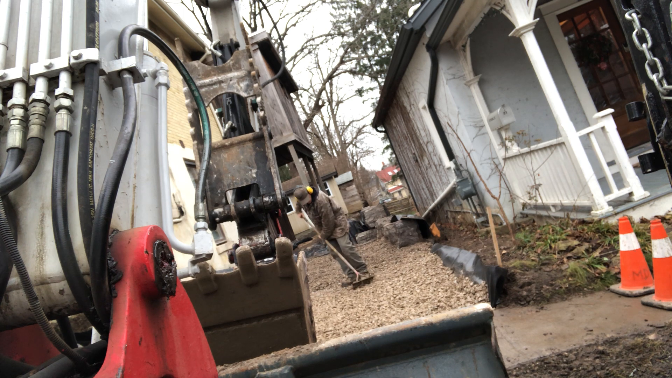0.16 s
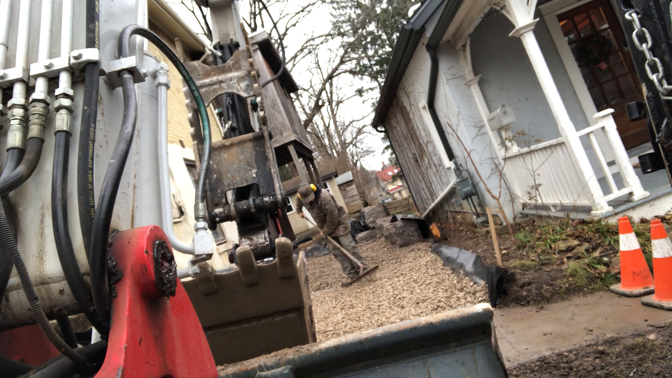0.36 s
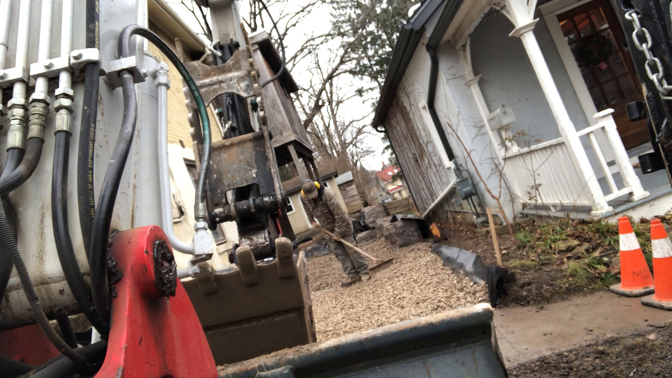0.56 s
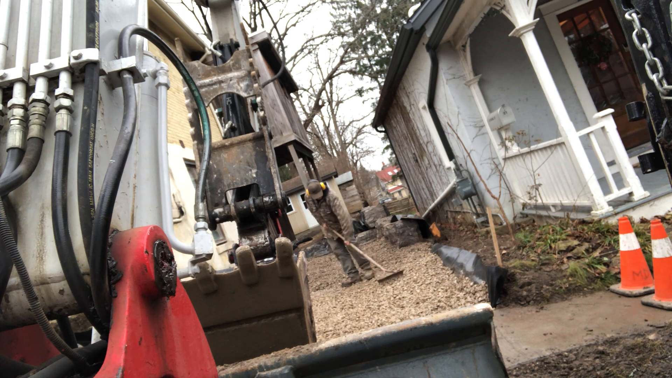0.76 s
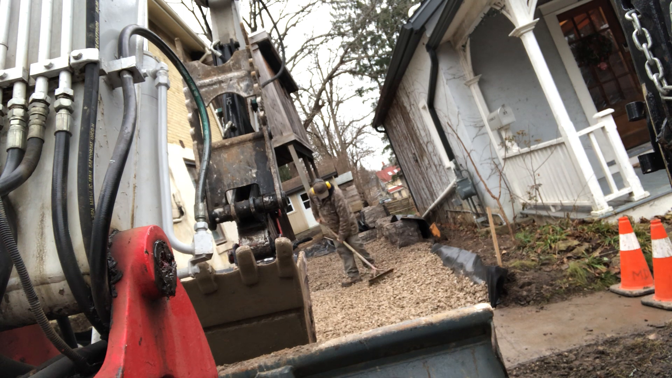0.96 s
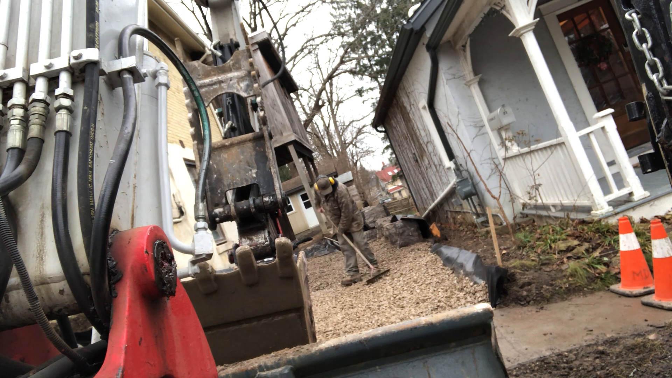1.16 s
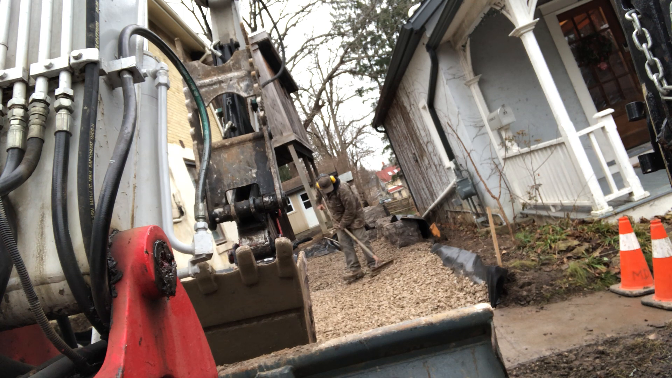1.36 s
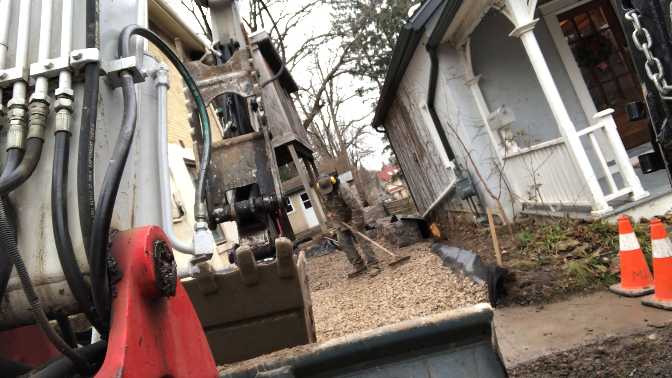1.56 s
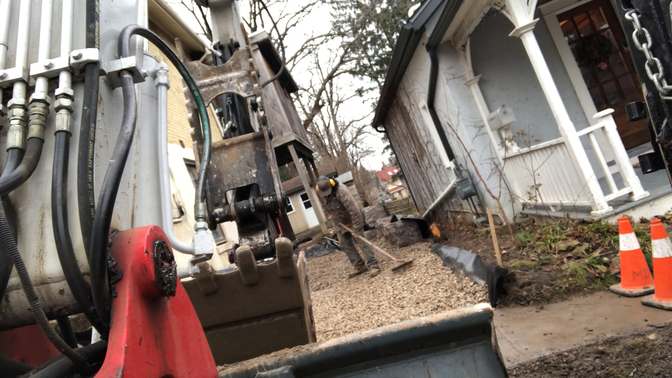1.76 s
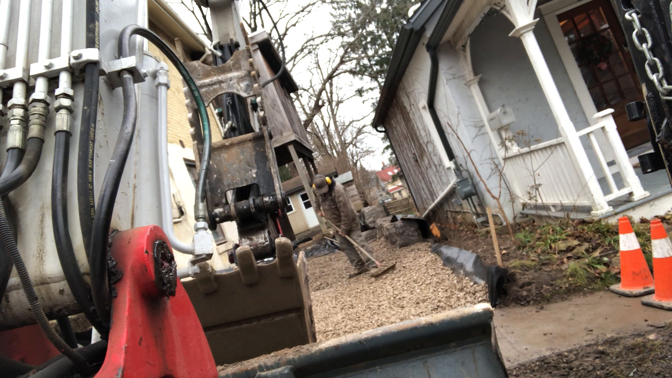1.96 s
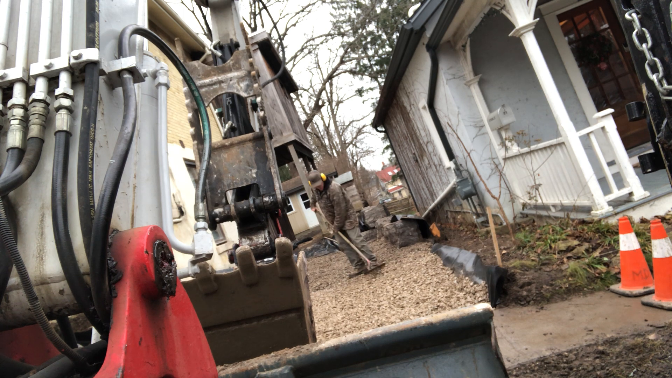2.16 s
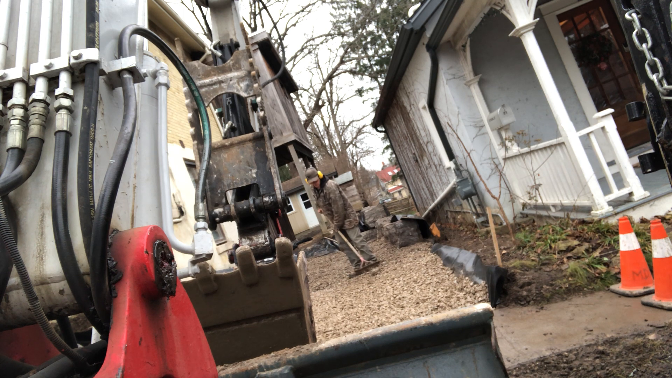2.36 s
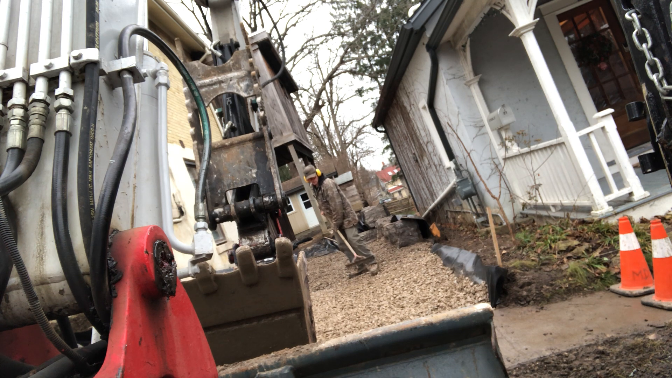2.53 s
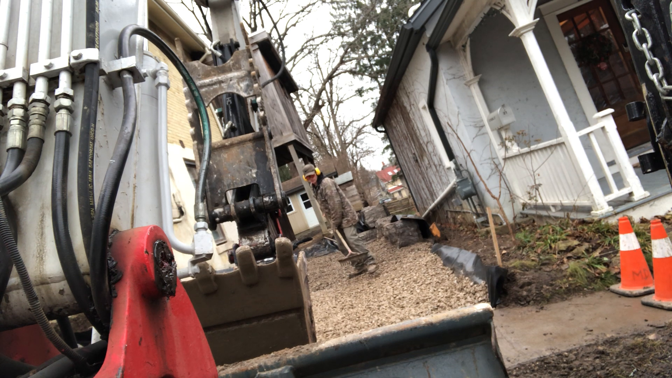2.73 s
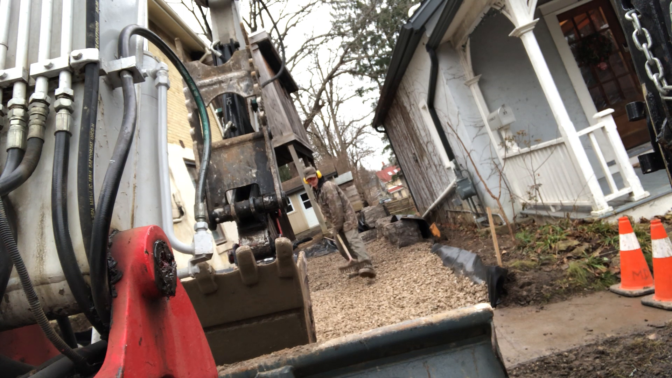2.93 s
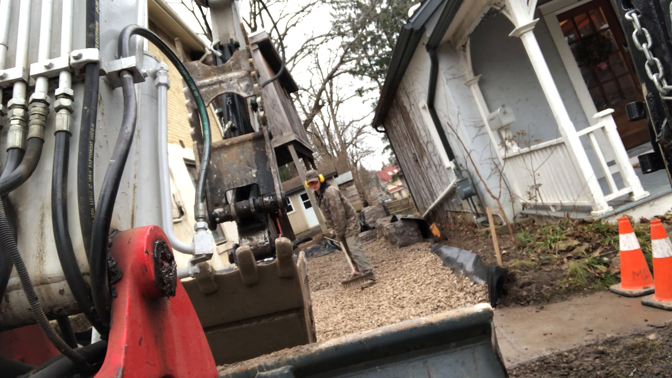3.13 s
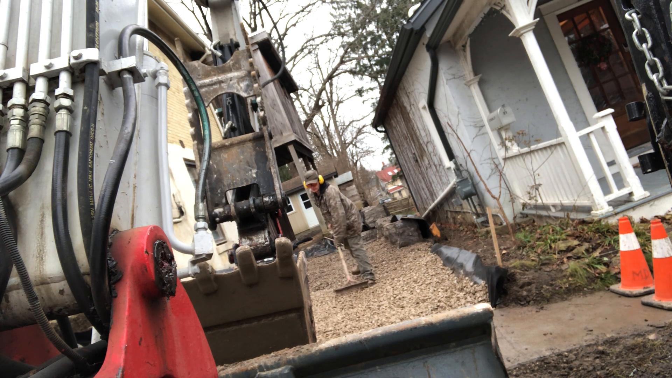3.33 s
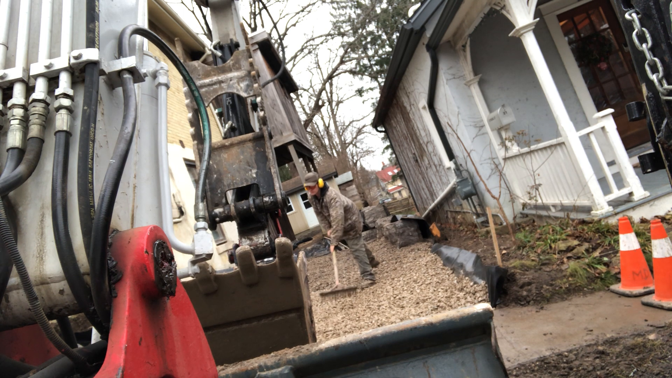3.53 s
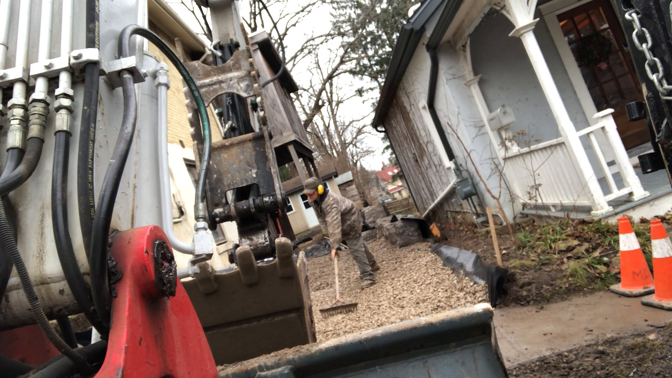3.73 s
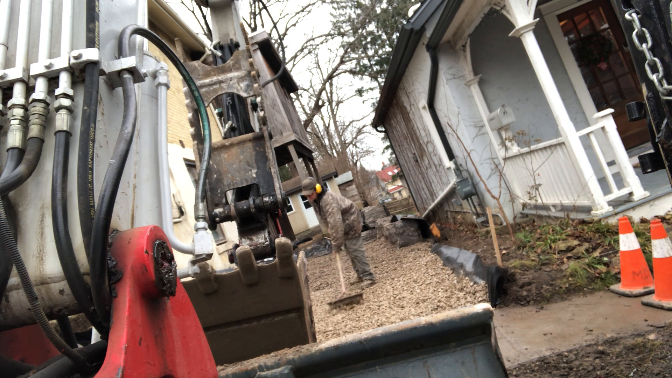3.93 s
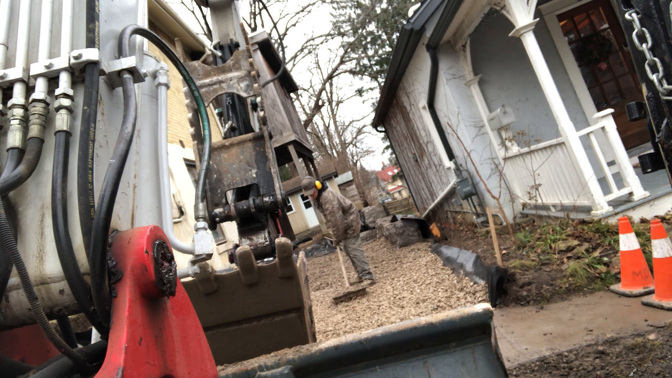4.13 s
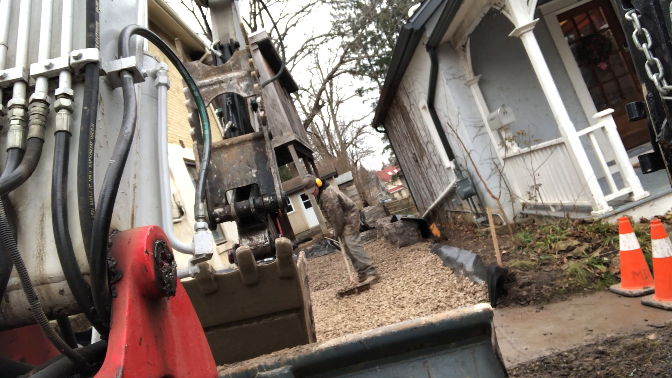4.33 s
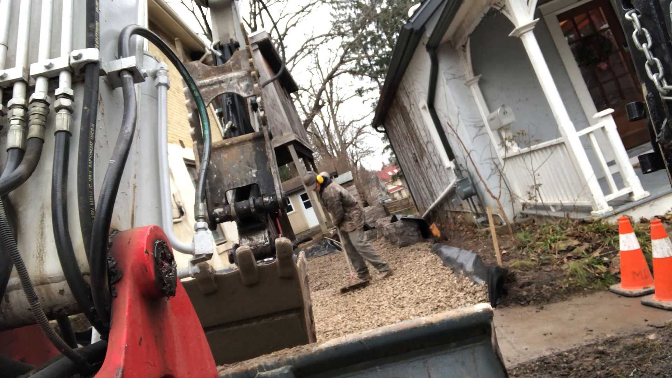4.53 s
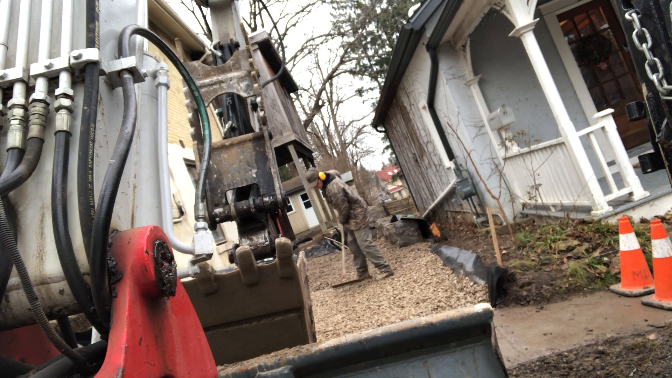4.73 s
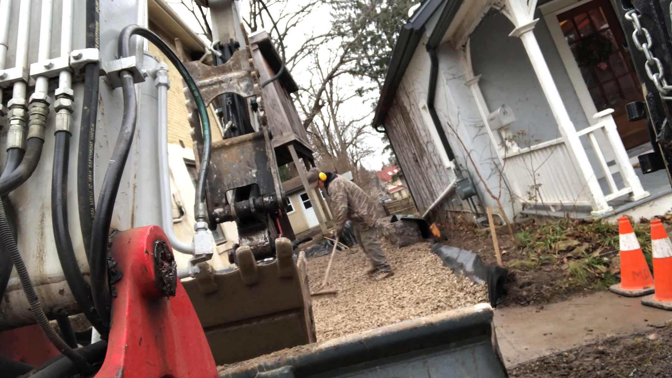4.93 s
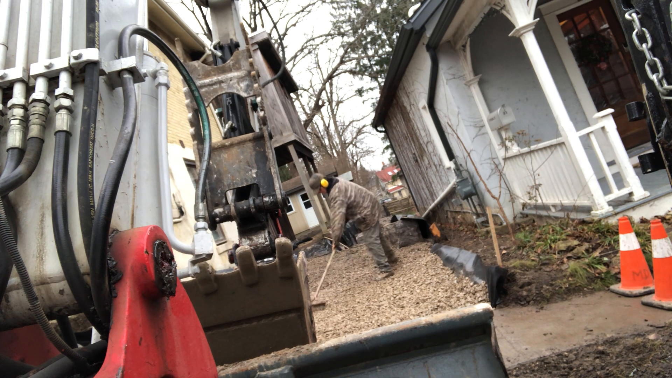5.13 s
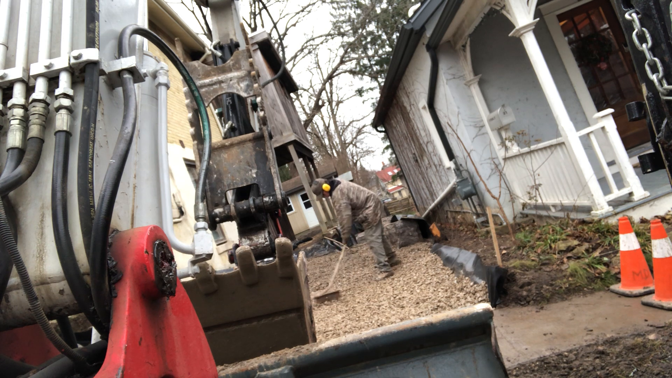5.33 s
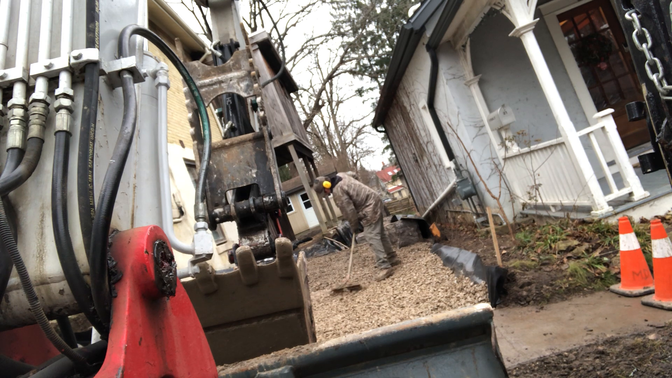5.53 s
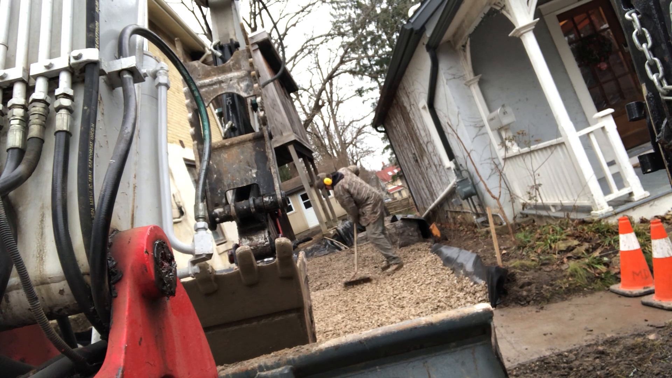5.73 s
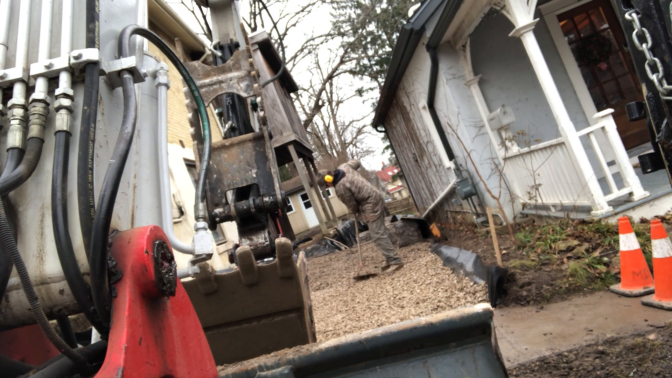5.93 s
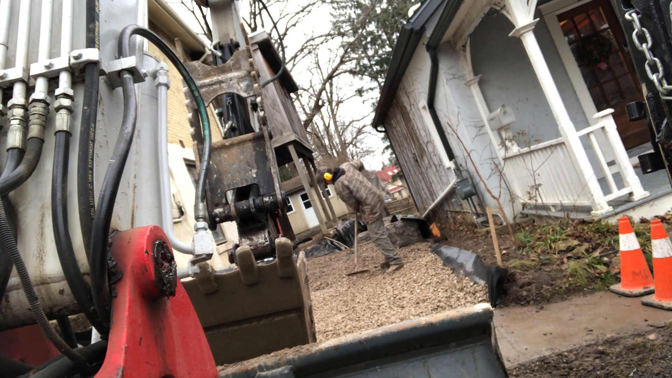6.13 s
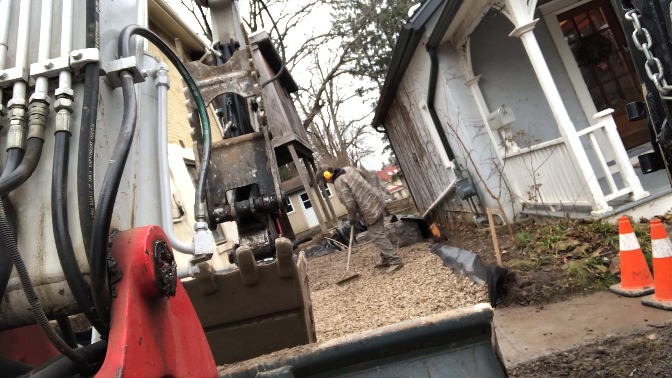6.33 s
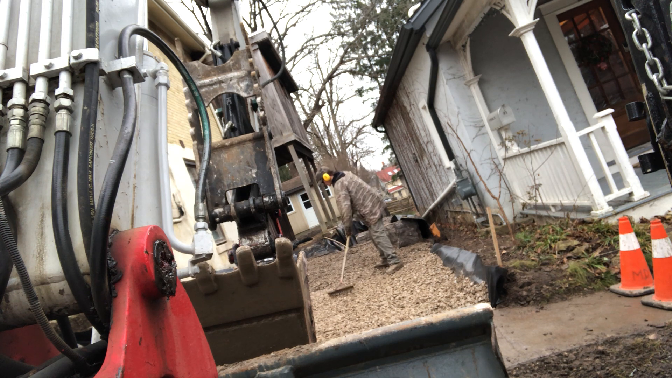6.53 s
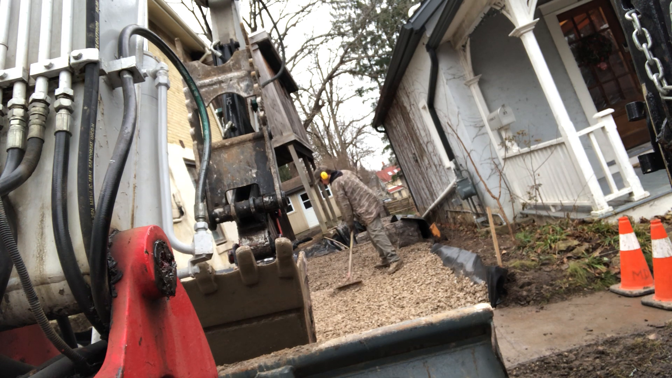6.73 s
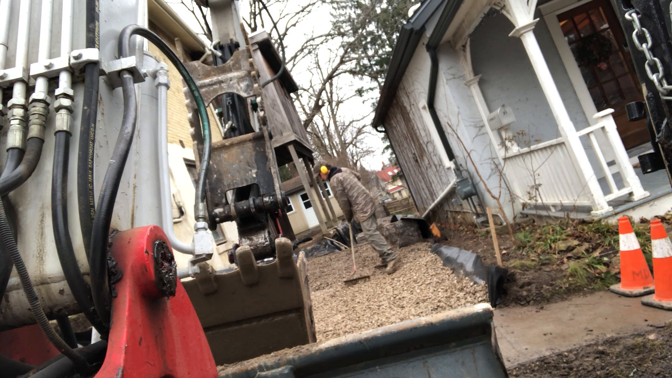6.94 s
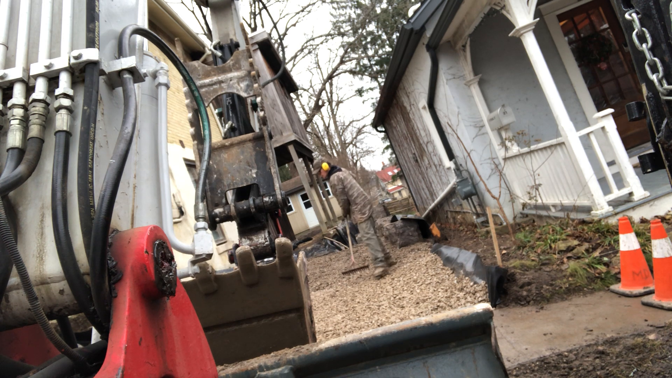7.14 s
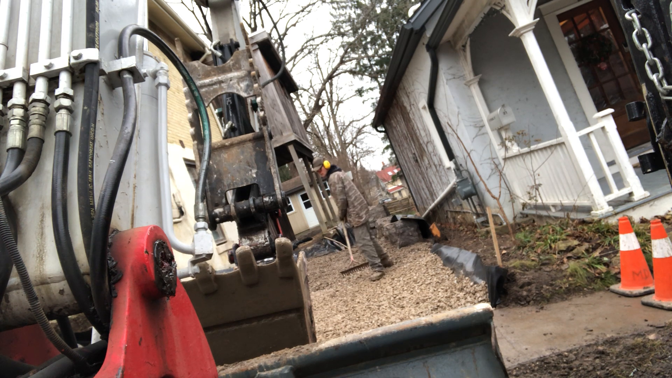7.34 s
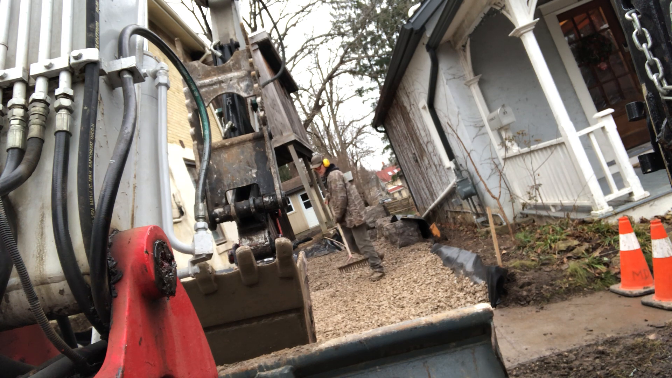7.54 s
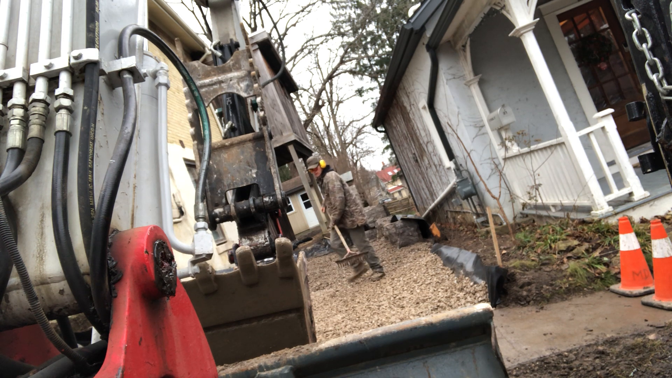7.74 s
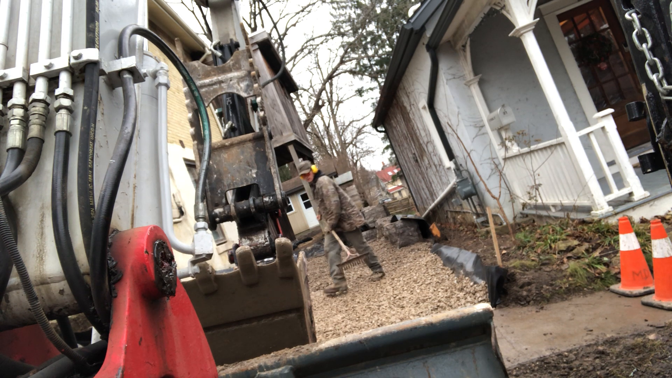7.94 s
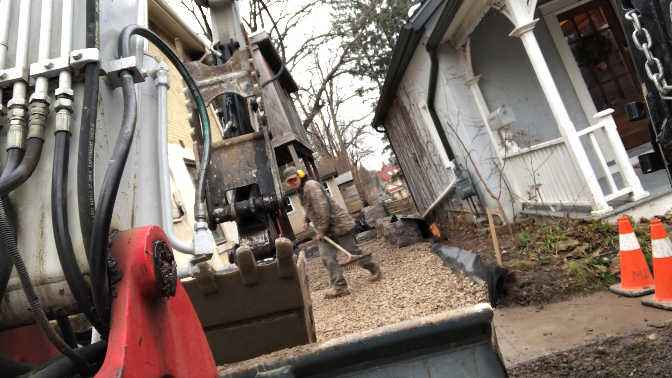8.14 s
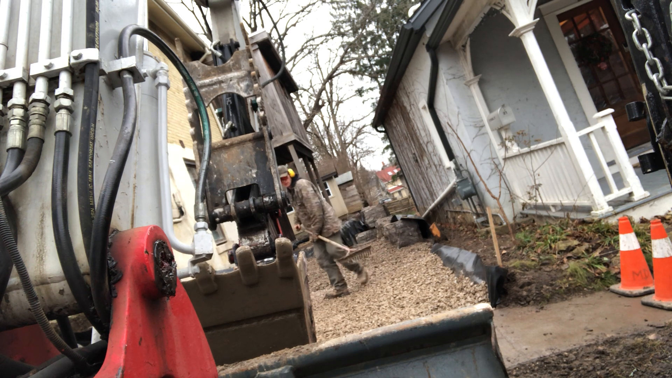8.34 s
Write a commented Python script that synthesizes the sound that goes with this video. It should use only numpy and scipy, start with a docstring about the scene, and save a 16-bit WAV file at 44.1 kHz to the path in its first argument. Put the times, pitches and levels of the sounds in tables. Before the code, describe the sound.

Bursts of gritty gravel raking with bright stony clacks and metallic tine ring, short pauses between, above soft distant rumble and hum.

```python
"""Broadband town rumble, fuzzy steady tones and the hum of far engines sound throughout, from the start.
A steel rake strokes loose gravel again and again: random stone collisions excite stone and steel modes,
hard single blows ring at one pitch, stones trickle on, and wall and parked machinery return echoes.
A thin tone passes at 1 s; a boot lands near 3 s, as filtered noise with a share of sine, and again at 8 s.
From 3.4 s a second hum, slightly lower, beats with the first."""
import sys
import numpy as np
from scipy import signal
from scipy.io import wavfile

SR = 44100
rng = np.random.default_rng(int(sys.argv[2]) if len(sys.argv) > 2 else 0)


def unload_audio(sound):
    """Save the sound as a 16-bit wav file, at the path given as the first command line argument."""
    columns = np.transpose(np.atleast_2d(sound))
    # keep every value between -1 and 1, then stretch to whole-number steps
    steps = np.round(np.clip(columns, -1, 1) * 32767)
    wavfile.write(sys.argv[1], SR, steps.astype(np.int16))


N = 369999


def gain_of(db):
    """Amplitude ratio: 20 dB is a factor of ten."""
    return 10 ** (np.asarray(db) / 20)


def evened(x):
    """Normalisation to unit rms."""
    return x / np.sqrt(np.mean(x ** 2) + 1e-20)


def read_spectrum(points, hz):
    """Linear interpolation of level on a logarithmic frequency axis."""
    f, level_db = np.transpose(points)
    return np.interp(np.log(hz + 1), np.log(f + 1), level_db)


def colour(x, points):
    """Minimum-phase filtering: the Hilbert transform of log gain gives the causal phase."""
    hz = abs(np.fft.fftfreq(8192, 1 / SR))
    log_gain = np.log(gain_of(np.maximum(read_spectrum(points, hz), -100)))
    phase = -signal.hilbert(log_gain).imag
    taps = np.fft.ifft(np.exp(log_gain + 1j * phase)).real[:4096]
    return signal.oaconvolve(x, taps)[:len(x)]


def mode(x, hz, width):
    """Single resonance: a two-pole peak of unit gain at its centre."""
    return signal.lfilter(*signal.iirpeak(hz, hz / width, SR), x)


def split(x, edges_hz):
    """Band-pass analysis: adjoining Butterworth bands from 30 Hz to 20 kHz."""
    edges_hz = [30, *edges_hz, 20000]
    bands = []
    for pair in zip(edges_hz, edges_hz[1:]):
        sos = signal.butter(4, pair, "band", fs=SR, output="sos")
        bands.append(signal.sosfilt(sos, x))
    return bands


def drift(hz):
    """Slow random modulation of unit rms: hz random values a second, joined by straight lines."""
    knots = rng.standard_normal(1000)
    return evened(np.interp(np.arange(N) / SR * hz, np.arange(1000), knots))


# Rumble spectrum: (frequency [Hz], relative spectral density [dB per Hz])
RUMBLE_SPECTRUM = [(15, -84), (25, -50), (43, -13.5), (60, -8.5), (110, -3.5), (190, -10), (270, -13),
                   (500, -15.5), (560, -22), (960, -24.5), (1300, -24), (2120, -29), (2250, -34),
                   (4000, -39), (7800, -45), (8300, -49), (16000, -51)]
RUMBLE_DB = -58.5


def rumble():
    """Coloured noise with slight amplitude modulation: the town rumble swells a little."""
    noise = colour(rng.standard_normal(N), RUMBLE_SPECTRUM)
    return gain_of(RUMBLE_DB + 0.49 * drift(hz=11.0)) * evened(noise)


# Fuzzy steady tones: (frequency [Hz], width of each of two resonances [Hz], rms level [dB])
FUZZY_TONES = [(124.9, 14.4, -65), (151, 13.8, -66.5), (235.4, 11.3, -71), (436.8, 31, -71.5),
               (1216, 14, -82), (1498, 26, -79.5), (1743, 25, -85), (2000, 1.27, -80.5), (2026, 34, -81)]


def fuzzy_tones():
    """Narrow-band noise: resonances in cascade leave tones of uneven amplitude, heard as a faint whine."""
    noise = rng.standard_normal(N)
    return sum(gain_of(db) * evened(mode(mode(noise, hz, width), hz, width)) for hz, width, db in FUZZY_TONES)


# Engine hum: (time [s], frequency [Hz], rms level of the first hum [dB])
ENGINE_HUM = [(0, 75.5, -72), (.35, 73.3, -69.5), (.96, 73, -59), (1.4, 73.7, -61), (2.1, 76.1, -56.5),
              (2.6, 76.1, -56.5), (2.75, 76.1, -63.5), (3.15, 75.8, -56), (3.6, 75.5, -63),
              (5.4, 75.8, -62), (8.39, 76.4, -65.5)]
SECOND_FROM_S, SECOND_RISE_S, SECOND_SHARE = 3.36, 0.29, 0.96  # share of the first hum's amplitude
BEAT_PER_S, FIRST_DIP_S = 0.79, 3.48


def engine_hums():
    """Beating: two sines a fraction of a hertz apart reinforce and cancel by turns."""
    t = np.arange(N) / SR
    s, hz, db = np.transpose(ENGINE_HUM)
    phase = 2 * np.pi * np.cumsum(np.interp(t, s, hz)) / SR
    second = SECOND_SHARE * np.clip((t - SECOND_FROM_S) / SECOND_RISE_S, 0, 1)
    lag = 2 * np.pi * BEAT_PER_S * (t - FIRST_DIP_S)
    pair = np.sin(phase) - second * np.sin(phase - lag)
    return np.sqrt(2) * gain_of(np.interp(t, s, db)) * pair  # sqrt(2): peak to rms


def knocks(crunch_db, most_per_s, thinning, spread_db, clump_db, sort_db, cycles, pitched):
    """Random point process: stone collisions, many under the rake, fewer as the gravel settles."""
    rate = most_per_s * gain_of(thinning * (crunch_db - crunch_db.max()))
    rate = np.clip(rate, 900, SR / 2)
    size = gain_of(spread_db * np.minimum(rng.exponential(1, N), 4) + clump_db * drift(hz=55))
    size = size / np.sqrt(np.mean(size ** 2))
    struck = rng.random(N) < rate / SR
    train = size * struck * np.sqrt(SR / rate) * gain_of(crunch_db)  # power independent of rate
    stone, t, out = rng.integers(0, 24, N), np.arange(1024) / SR, np.zeros(N)
    for k, hz in enumerate(np.linspace(1100, 15500, num=24)):
        rattle = rng.standard_normal(1024) * gain_of(-60 * t / 0.0063)
        # each size of stone has its pitch
        rattle += pitched * evened(mode(rattle, hz, hz / cycles)) * np.std(rattle)
        share = gain_of(sort_db * drift(hz=18))  # the tines meet now more, now fewer of this size
        out += signal.oaconvolve(train * share * (stone == k), rattle / np.linalg.norm(rattle))[:N]
    return out


# Stone spectrum: (frequency [Hz], relative spectral density [dB per Hz])
STONE_SPECTRUM = [(410, -42), (700, -5), (863, -11.5), (1420, -7.5), (1620, 2.5), (2700, -6.5),
                  (3600, -7.5), (4320, -0.5), (7290, -4.5), (8310, -9), (9860, -7), (15000, -19),
                  (16000, -25)]
# Modes of the steel rake head: (frequency [Hz], width [Hz], relative level [dB])
RAKE_MODES = [(1350, 45, -27), (1488, 160, 5.5), (2750, 325, 3.5), (3086, 260, 0), (4330, 60, -3.5),
              (5600, 160, -32), (6020, 230, -14.5), (7290, 153, -2)]


def gravel_and_rake(x, contacts, steel_db=-2):
    """Modal excitation: knocks sound as stone and drive each steel mode as far as contact allows."""
    steel = np.zeros(len(x))
    for (hz, width, db), contact in zip(RAKE_MODES, contacts):
        steel += gain_of(db) * mode(x * contact, hz, width)
    return colour(x, STONE_SPECTRUM) + gain_of(steel_db) * steel


TICKS_PER_S, TICK_DB, TICK_TOP_DB = 130, -6.5, -8.5  # relative levels; the last is for the top band


def ticks(level_db):
    """Sparse impulse noise: loose pebbles tick on their own, brightly and very unevenly, in and after strokes."""
    size = gain_of(1.7 * np.minimum(rng.exponential(1, N), 3))
    struck = size * (rng.random(N) < TICKS_PER_S / SR)
    envelope = signal.lfilter([1], [1, -np.exp(-1 / (.0015 * SR))], struck)  # 1.5 ms decay
    burst = envelope * rng.standard_normal(N)
    _, mid, top = split(colour(burst, STONE_SPECTRUM), [2450, 6500])
    return gain_of(TICK_DB + level_db) * evened(mid + gain_of(TICK_TOP_DB) * top)


def lay(tables, quiet_db):
    """Piecewise-linear envelopes over the whole length; the first is quiet between tables."""
    t, rows = np.arange(N) / SR, np.concatenate(tables)
    columns = [np.interp(t, rows[:, 0], column) for column in rows.T[1:]]
    inside = sum((t >= table[0][0]) & (t <= table[-1][0]) for table in tables) > 0
    return [np.where(inside, columns[0], quiet_db)] + columns[1:]


# One table a stroke or shuffle, before the mix gain:
# (time [s], crunch level [dB], ring of the rake above the crunch [dB])
RAKE_STROKES = [
    [(0.0, -46.5, 0.5), (0.03, -54, -9), (0.132, -49, -6), (0.372, -54, -7.5), (0.504, -63, -11),
     (0.596, -77, 1), (0.6, -70, -4)],
    [(0.843, -56.5, -6), (0.865, -49.5, 9), (0.883, -68, -5), (0.897, -50, 0), (1.005, -45, -1),
     (1.253, -53.5, 0), (1.337, -60, -2), (1.415, -63, -11), (1.55, -74, -11)],
    [(1.724, -64, -4), (1.733, -61.5, -1), (1.75, -79, 23)],
    [(1.757, -54.5, 1), (1.849, -56.5, 3.5), (1.905, -63, 2), (1.908, -52, 3)],
    [(1.917, -32, -7), (1.939, -52.5, 3), (1.965, -41, -5), (1.995, -51.5, 1), (2.049, -53, 3),
     (2.057, -39, -8), (2.069, -51.5, -3), (2.135, -56, 4.5), (2.4, -76, -9)],
    [(3.135, -58, -25), (3.141, -61, -12), (3.149, -61, 2), (3.179, -55.5, 0), (3.28, -76, 9)],
    [(3.788, -54, -3), (3.798, -49, 1.5), (3.822, -55.5, -1), (3.91, -47.5, -2.5), (4.336, -46, -6.5),
     (4.35, -44, -11), (4.44, -44.5, -1.5), (4.578, -47, -4.5), (4.69, -52, -13), (4.7, -50.5, -14),
     (5.042, -74, -14), (5.05, -77, 0)],
    [(5.203, -58.5, -9), (5.219, -52.5, -1), (5.255, -62, -1), (5.299, -47.5, -3), (5.577, -41.5, -5.5),
     (5.817, -49, -6.5), (6.049, -50, -11), (6.153, -57.5, -7), (6.243, -59, -18.5), (6.361, -68, -4),
     (6.379, -69, -17), (6.45, -75, 1)],
    [(6.64, -49, -5), (6.706, -57, 7.5), (6.712, -43, 3.5), (6.73, -54.5, 1), (6.786, -42.5, -2.5),
     (6.95, -52.5, 2), (6.978, -47, 0), (7.01, -55.5, 1), (7.178, -63, -9), (7.184, -71, 1), (7.52, -75, 3)],
    [(7.84, -81, 17), (8.064, -80, -6), (8.088, -70, -13), (8.11, -65.5, 6), (8.292, -79.5, 6),
     (8.3, -79, 10)],
]
# What each stroke stirs up at full crunch: (large stones above the crunch [dB], grit above it [dB])
STIRRED_BEDS = [(-4, -11), (0, -11), (10, -15.5), (1.5, -11), (1.5, -10.5), (-2.5, -14), (-2, -9), (-2, -8),
                (-1.5, -8.5), (4, -4.5)]
FULL_DB = -48  # crunch of a full stroke, before the mix gain
# as the crunch falls below that, large stones linger and grit thins (dB per dB)
LARGE_PER_DB, GRIT_PER_DB = -0.3151, .06
WANDER_DB, WANDER_HZ = 5, 7  # other tines catch from moment to moment, so each ring comes and goes
SETTLE_S = 0.13  # the bed falls silent this long after a stroke, unless the next begins
# Lowest ring favoured by the scraping head: (frequency [Hz], width [Hz], added level [dB])
SCRAPE_MODE = (1410, 200, 8)


def strokes():
    """Granular friction: dense collisions in four bands, from the ring of the rake to the finest grit."""
    next_starts = [table[0][0] for table in RAKE_STROKES[1:]] + [N / SR]
    tables = []
    for table, bed, next_start in zip(RAKE_STROKES, STIRRED_BEDS, next_starts):
        end = min(table[-1][0] + SETTLE_S, next_start)
        tables.append(np.array([(*row, *bed) for row in [*table, (end, -90, 0)]]))
    crunch_db, ring_db, large_db, grit_db = lay(tables, quiet_db=-120)
    force_db = np.maximum(crunch_db - FULL_DB, -30)
    large_db = large_db + LARGE_PER_DB * force_db
    grit_db = grit_db + GRIT_PER_DB * force_db

    hits = knocks(crunch_db, most_per_s=9000, thinning=.4, spread_db=2.0, clump_db=1.0,
                  sort_db=2.0, cycles=6.5, pitched=0.78)
    contact = np.clip((crunch_db + 64) / 12, 0, 1)  # the faint trickle comes after the rake has lifted
    contacts = [contact * gain_of(WANDER_DB * drift(WANDER_HZ)) for _ in RAKE_MODES]
    bands = split(gravel_and_rake(hits, contacts, steel_db=-5.0), [2050, 3700, 8200])
    scrape_hz, scrape_width, scrape_db = SCRAPE_MODE
    bands[0] = bands[0] + gain_of(scrape_db) * mode(bands[0], scrape_hz, scrape_width)

    level = np.sqrt(np.mean(gain_of(crunch_db) ** 2))
    band_dbs = (ring_db, large_db, 0, grit_db)
    crunch = level * sum(gain_of(db) * evened(band) for db, band in zip(band_dbs, bands))
    return crunch + ticks(FULL_DB + 0.91 * (crunch_db - FULL_DB))


def yard(x, t60, first_s):
    """Diffuse reflection: wall and machinery scatter echoes, changing as the rake moves about."""
    t, out = np.arange(6000) / SR, np.zeros(N)
    for k in range(3):
        signs = rng.choice([-1., 1.], 6000) * (rng.random(6000) < .1)
        taps = signs * gain_of(-60 * t / t60) * (t > first_s)
        # three echo patterns trade places at constant summed power
        share = np.sqrt(2 / 3) * np.cos(np.pi * (14 * np.arange(N) / SR + k / 3))
        out += signal.oaconvolve(x * share, taps / np.linalg.norm(taps))[:N]
    return out


# Single stones struck hard, before the mix gain: (time [s], peak level [dB], ring frequency [Hz],
# 1.05-3.7 kHz level above the middle band [dB], treble level above the middle band [dB])
HARD_BLOWS = [(0.1002, -46, 4260, -5, -4), (0.134, -30.5, 4330, -8, 3), (0.2083, -39, 2940, -5, -4),
              (0.3372, -37, 5330, 2, -9), (0.4746, -39, 5660, -1, 1), (0.846, -32.5, 3350, -11, -1),
              (0.8987, -27.5, 3120, -7, -2), (0.921, -27, 3080, -1, 4), (0.9467, -32, 3140, -1, 4),
              (0.9847, -29, 4760, -5, 6), (1.0294, -27, 3300, 3, -4), (1.0723, -29, 2526, -9, -1),
              (1.1418, -31.5, 4200, -1, -4), (1.1964, -31, 5040, -15, 0), (1.2351, -33, 2280, 0, -10),
              (1.3612, -43, 3490, -5, -11), (1.3825, -40, 2710, -12, -15), (1.4158, -38.5, 4430, -5, -5),
              (1.729, -36, 2900, -12, -18.5), (1.7585, -31, 2735, -8, -10), (1.7754, -35, 2700, -8, -7),
              (1.8426, -38, 3250, -5, -4), (1.917, -18.5, 6560, -22, -0.5), (2.0232, -30.5, 2310, -11, 4),
              (2.0532, -25, 5540, -9, 8), (2.089, -30.5, 4400, -3, 1), (2.176, -39, 2660, -6, -16),
              (2.1963, -44, 2633, 9, -13), (2.2517, -43, 4730, 5, 3), (2.386, -48.5, 4370, -3, -3),
              (3.1367, -44, 7000, -8, -15), (3.7912, -36, 2660, -6.5, -2), (3.8447, -37, 3130, 3, -4),
              (3.8631, -35, 2600, -13, -4), (3.9408, -31, 5600, -5, -4), (3.9823, -29, 6360, -20, -1),
              (4.1586, -28, 7140, -2, -8), (4.2527, -28, 3070, -6, -2), (4.348, -32, 4270, -1, -2),
              (4.4484, -28.5, 7290, -13, 0), (4.589, -30, 5940, -11, -8), (4.7007, -36.5, 4420, -12, -13),
              (4.8636, -38, 4200, -4, -7), (4.909, -44, 4330, -3, -4), (5.206, -45, 6200, 2, 19),
              (5.2704, -38, 7060, 0, -4), (5.2806, -42.5, 2720, -5, -7), (5.2949, -32, 3180, -5, -4),
              (5.3285, -32, 2750, -14, -9), (5.362, -28, 7230, -3, -7), (5.3847, -24.5, 4030, 3, -2),
              (5.429, -28.5, 7150, -8, -11), (5.5798, -24.5, 5050, -14, 10), (5.666, -29.5, 7320, -18, -9),
              (5.7309, -30.5, 2760, -7, 2), (5.7967, -30, 5500, 2, -2), (5.984, -34, 5240, -10, -10),
              (6.179, -40, 3930, -10, -7), (6.207, -35, 5120, 3, 13), (6.235, -37, 4270, -9, -1),
              (6.6416, -37, 2477, -13, -4), (6.6924, -32.5, 3670, -15, -1), (6.7128, -26, 6250, -7, -2),
              (6.7602, -30, 2370, -16, 14), (6.78, -27, 6550, -15, 4), (6.7989, -24, 7400, -17, -1),
              (6.8493, -29, 3090, -9, 7), (6.865, -23.5, 4260, 3, 0.5), (6.9514, -33, 2460, -10, 3),
              (6.9721, -28, 4260, 4.5, -4), (7.1147, -40.5, 3250, -6.5, 1), (7.223, -46.5, 5450, 3, 0)]


def clacks():
    """Impact excitation: a hard blow is a rattle of a few milliseconds that leans to one pitch."""
    out, t = np.zeros(N + 1024), np.arange(1024) / SR
    decay = gain_of(-60 * t / 0.0088) + 0.24 * gain_of(-60 * t / 0.033)
    shape = (1 - np.exp(-t / 0.001)) * decay
    rattles = rng.standard_normal((len(HARD_BLOWS), 1024)) * shape
    sounded = np.array([gravel_and_rake(rattle, np.ones(len(RAKE_MODES))) for rattle in rattles])
    _, low, mid, high = split(sounded, [1050, 3700, 8200])
    for k, (s, db, hz, low_db, high_db) in enumerate(HARD_BLOWS):
        blow = evened(mid[k]) + 1.7 * evened(mode(rattles[k], hz, 600))
        blow += gain_of(low_db) * evened(low[k]) + gain_of(high_db) * evened(high[k])
        out[round(s * SR):][:len(t)] += gain_of(db) * blow / abs(blow).max()
    return out[:N]


# Thin passing tone: (start [s], end [s], frequency [Hz], peak level [dB])
PASSING_TONE = (1.05, 1.7, 870, -75)


def thin_tone():
    """Pure tone: a sine with linear fades of 80 ms."""
    t = np.arange(N) / SR
    start, end, hz, db = PASSING_TONE
    fade = np.clip(np.minimum(t - start, end - t) / .08, 0, 1)
    return gain_of(db) * np.sin(2 * np.pi * hz * t) * fade


# Heel or toe on the ground: (time [s], length [s], level [dB], frequency [Hz],
# amplitude share that rings at the pitch [0-1])
FOOTFALLS = [(3.136, 0.12, -48.5, 220.3, 0.38), (3.202, 0.091, -54, 425, .1),
             (8.085, 0.2, -58.5, 390, 0.06)]
STEP_RISE = 0.15  # share of the length


def steps():
    """Damped impact: the sole presses the bed of stones, a dull rough thud that swells and dies."""
    out = np.zeros(N)
    for s, length, db, hz, pure in FOOTFALLS:
        noise = rng.standard_normal(16384)
        thud = evened(mode(mode(noise, hz, 120), hz, 280))[4096:]  # skip the build-up of the resonances
        u = np.arange(len(thud)) / SR / length
        thud = (1 - pure) * thud + pure * np.sqrt(2) * np.sin(2 * np.pi * hz * length * u)
        shape = np.sin(np.pi / 2 * np.interp(u, [0, STEP_RISE, 1], [0, 1, 0]))
        part = out[round(s * SR):][:len(thud)]
        part += (gain_of(db) * shape * thud)[:len(part)]
    return out


def scene():
    """Superposition: gravel, direct and reflected, over the background and the footfalls."""
    background = rumble() + fuzzy_tones() + engine_hums() + thin_tone()
    gravel = strokes() + clacks()
    echoes = yard(gravel, t60=0.15, first_s=.002)
    return (background + gain_of(-3.5) * gravel + gain_of(-9.5) * echoes + steps())[None]


def record(dry):
    """Band limitation: a linear-phase low-pass removes what lies above 15.85 kHz."""
    taps = signal.firwin(511, 15850, window=("kaiser", 9), fs=SR)
    return signal.oaconvolve(dry, taps[None], "same")


dry = scene()
out = record(dry)
unload_audio(out)
```